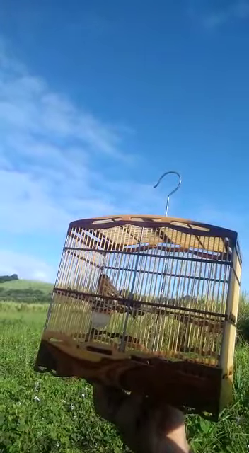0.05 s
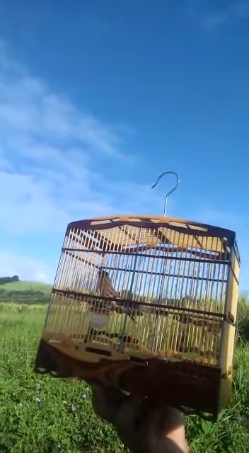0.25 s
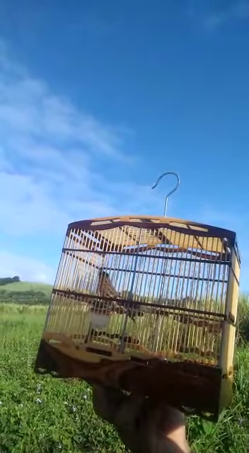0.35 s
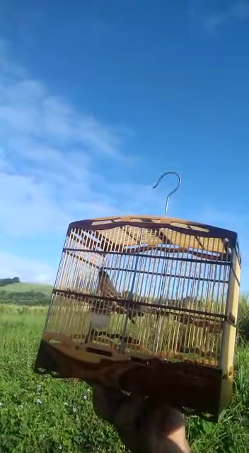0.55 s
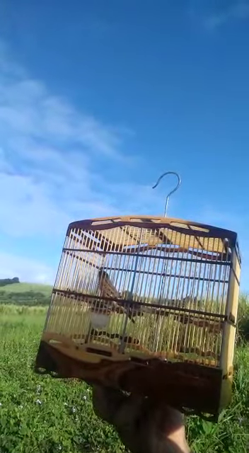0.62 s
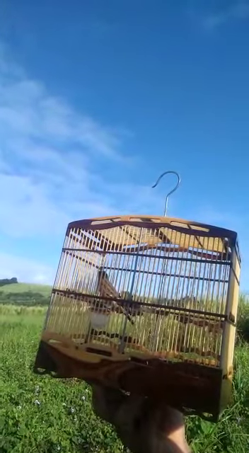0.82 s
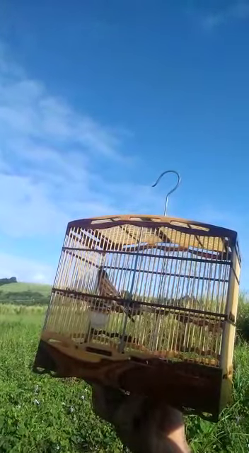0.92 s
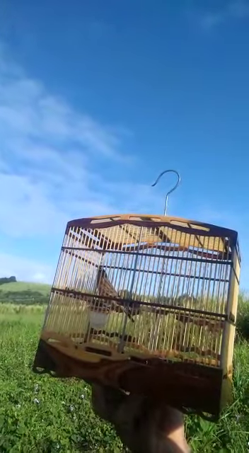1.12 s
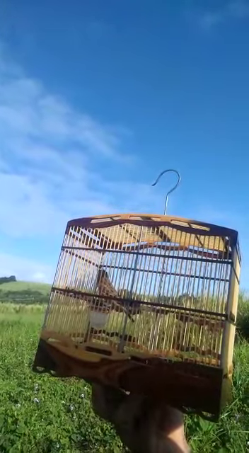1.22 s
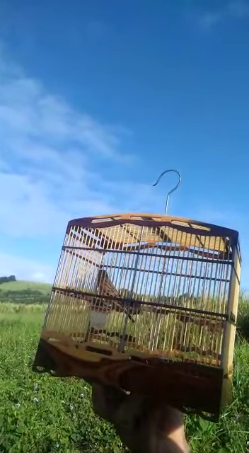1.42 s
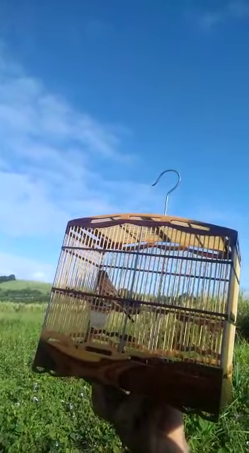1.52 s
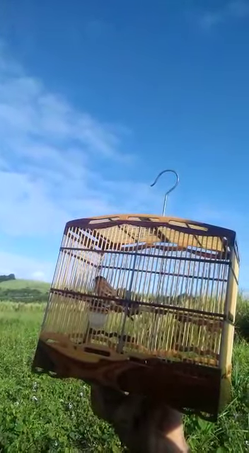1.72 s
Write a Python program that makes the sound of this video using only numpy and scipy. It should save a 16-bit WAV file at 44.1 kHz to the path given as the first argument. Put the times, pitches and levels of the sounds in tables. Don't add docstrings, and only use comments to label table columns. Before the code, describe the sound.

Finch song, high pure sliding whistles with quick trills, over soft insects and faint distant engine hum.

```python
import sys
import numpy as np
from scipy import signal
from scipy.io import wavfile
from scipy.ndimage import uniform_filter1d

SR = 44100
rng = np.random.default_rng(int(sys.argv[2]) if len(sys.argv) > 2 else 0)


def transcribe(signal):
    frames = np.atleast_2d(signal).T
    limited = np.clip(frames, -1, 1)
    pcm = np.round(limited * 32767).astype(np.int16)
    wavfile.write(sys.argv[1], SR, pcm)


def level_to_linear(level):
    exponent = np.asarray(level, float) / 20
    return 10 ** exponent


N = 77175


def at_hz(points, hz, column=1):
    points = np.array(points)
    return np.interp(np.log(hz), np.log(points[:, 0]), points[:, column])


def rms_one(x):
    return x / np.sqrt(np.mean(x ** 2) + 1e-20)


def drift(rate_hz):
    settle = 8000
    r = np.exp(-2 * np.pi * rate_hz / SR)
    noise = rng.standard_normal(N + settle)
    return rms_one(signal.lfilter([1], [1, -2 * r, r * r], noise)[settle:])


def resonate(x, hz, width_hz):
    r = np.exp(-np.pi * width_hz / SR)
    ring = [1, -2 * r * np.cos(2 * np.pi * hz / SR), r * r]
    return signal.lfilter([1, 0, -1], ring, x) * (1 - r * r) / 2


def stereo_sine(phase, level_db, pan_db, lead):
    left, right = level_to_linear(pan_db / 2), level_to_linear(-pan_db / 2)
    pair = np.array([left * np.sin(phase + lead), right * np.sin(phase)])
    return np.sqrt(8) * level_to_linear(level_db) / (left + right) * pair


def coloured(spectrum, patchy_db):
    # frequency in Hz, how alike left and right are (1 same, 0 unrelated, -1 opposite).
    likeness = [(60, 1), (1000, 0.7), (2400, 0.87), (4400, -0.39), (15000, 0.011)]
    # frequency in Hz, left over right in dB.
    tilt = [(130, -1.3), (640, 1), (1410, -7), (3100, -8), (6820, -1.5)]
    out = 0
    white = rng.standard_normal((2, 2, N + 4000))
    lowest, highest = spectrum[0][0], min(spectrum[-1][0], 19000)
    edges = lowest * 2 ** np.arange(0, np.log2(highest / lowest) + .01, .25)
    for k, (low, high) in enumerate(zip(edges, edges[1:])):
        band = signal.butter(2, [low, high], "band", fs=SR, output="sos")
        mid, side = signal.sosfilt(band, white[k % 2])[:, -N:]
        hz = np.sqrt(low * high)
        alike = np.clip(at_hz(likeness, hz), -1, 1)
        balance_db = at_hz(tilt, hz) * np.array([[.5], [-.5]])
        gain = level_to_linear(at_hz(spectrum, hz) + patchy_db * drift(6) + balance_db)
        out = out + gain * (np.sqrt(1 + alike) * mid + np.sqrt(1 - alike) * side * [[1], [-1]])
    return out / np.sqrt(np.mean(out.mean(0) ** 2))


def crests(turn, point):
    return np.cos(turn) + point * np.cos(2 * turn) + point ** 2 * np.cos(3 * turn)


def trill():
    # time of the last crest in seconds, pointedness.
    last_crests = [
        (0.9272, 0.28),
        (1.442, 0.55),
    ]
    # time in seconds, crests per second, pitch swing in Hz, level ride in dB.
    high_course = [(.795, 140, 20, 0), (.83, 128, 55, .1), (.855, 130, 72, .5), (.87, 113, 145, 1.4),
                   (.89, 113, 210, 2.2), (.908, 114, 205, 1.7), (.918, 112, 195, -1.2),
                   (.934, 112, 120, -.5)]
    swoop_course = [(1.371, 335, 130, -1), (1.396, 275, 100, -1), (1.4035, 265, 70, -.6),
                    (1.408, 180, 60, -.4), (1.414, 149, 90, -.8), (1.421, 145, 100, -.8),
                    (1.428, 114, 120, -.6), (1.442, 110, 150, -1.7), (1.456, 90, 0, 0)]
    level_shift = -0.29
    t = np.arange(N) / SR
    swing, dip = np.zeros(N), np.zeros(N)
    for rows, (crest, point) in zip([high_course, swoop_course], last_crests):
        s, rate, swing_hz, ride_db = np.transpose(rows)
        turn = 2 * np.pi * np.cumsum(np.interp(t, s, rate)) / SR
        turn = turn - np.interp(crest, t, turn)
        size = np.interp(t, s, swing_hz, left=0, right=0)
        ride = np.interp(t, s, ride_db, left=0, right=0)
        swing += size * (1 + .2 * drift(60)) * crests(turn, point)
        dip += ride * crests(turn + level_shift, point)
    return swing, dip


def whistled_note(rows, tones, main_lead, swing, dip, flutter):
    # frequency in Hz, left lead in radians, left over right in dB.
    ports = [(1700, -.2, -.5), (5400, .4, -9), (7000, 1.1, -3.5), (8300, 1.2, -4), (9500, 3.1, -4),
             (10600, 4.3, -5), (12500, 4.3, -7), (14000, 4.2, -12), (15600, 6.2, -15)]
    # frequency in Hz, change of level in dB.
    colour = [(6000, 1), (7000, -4.5), (8500, 1), (9200, -4), (10300, -13.5), (12800, 4.5), (13600, -0.5),
              (14300, 9)]
    edge_s, overtone_growth = .0025, .5
    t = np.arange(N) / SR
    s, hz, db, pan_db = np.transpose(rows)
    on = (t > s[0]) & (t < s[-1])
    now = t[on]
    pitch = uniform_filter1d(np.interp(now, s, hz), size=120, mode="nearest") + swing[on]
    level = uniform_filter1d(np.interp(now, s, db), size=200, mode="nearest") + dip[on]
    edge = np.clip(np.minimum(now - s[0], s[-1] - now) / edge_s, 0, 1)
    cycles = np.cumsum(pitch) / SR
    main = np.argmax(tones) + 1
    out = np.zeros((2, N))
    for k, tone_db in enumerate(tones, 1):
        tone_level = level + tone_db + at_hz(colour, k * pitch)
        if k > main:
            tone_level = tone_level + overtone_growth * (level - level.max()) + 2 * flutter[on]
        if k == main:
            pan, lead = np.interp(now, s, pan_db), main_lead
        else:
            pan, lead = at_hz(ports, k * pitch, column=2), at_hz(ports, k * pitch)
        out[:, on] += edge * stereo_sine(2 * np.pi * k * cycles, tone_level, pan, lead)
    return out


def breath_puffs():
    # start in seconds, length in seconds, centre in Hz, width in Hz, level in dB.
    puffs = [
        (1.074, 0.04, 4400, 700, -45.5),
        (1.153, .01, 3660, 820, -38),
        (.448, 0.0064, 4300, 570, -57),
    ]
    t, out = np.arange(N) / SR, np.zeros((2, N))
    for s, length, hz, width_hz, db in puffs:
        x = np.clip((t - s) / length, 0, 1)
        noise = rng.standard_normal((2, N))
        breath = rms_one(resonate(resonate(noise, hz, width_hz), hz, width_hz))
        out += level_to_linear(db) * 7 * x * (1 - x) ** 2 * breath * level_to_linear([[-3], [3]])
    return out


def bird():
    # time in seconds, pitch in Hz, level in dB,
    # left over right in dB as the head turns.
    low = [(.168, 3170, -68.5, -10), (.2, 2978, -41, -12), (.222, 2855, -32.5, -10), (.25, 2771, -30.5, -9),
           (.337, 2532, -35.5, -12), (.346, 2533, -41.5, -3), (.353, 2530, -57.5, -8)]
    middle = [(.448, 4510, -55.5, -1.5), (.453, 3760, -48, 0), (.468, 3717, -30, -1), (.5, 3567, -20.5, -6),
              (.57, 3479, -21.5, -6.5), (.585, 3421, -22.5, -10.5), (.65, 3282, -23, -12),
              (.66, 3390, -37.5, -14)]
    high = [(.758, 5060, -44.5, -16), (.768, 4766, -36.5, -4), (.782, 4794, -21, -8),
            (.83, 4747, -16.5, -4), (.858, 4698, -18, -5.5), (.892, 4412, -18.5, -6.5),
            (.912, 4366, -19.5, -4), (.925, 4463, -20.5, -12), (.935, 4340, -30, -14.5)]
    nasal = [(1.084, 1428, -40.5, -10), (1.089, 1656, -48.5, -4.5), (1.1, 1680, -43, -13.5),
             (1.12, 1727, -41, -10.5), (1.142, 1746, -41.5, -11), (1.157, 1757, -56, -13)]
    nasal_under = [(1.084, 2950, -45.5, -10), (1.091, 3290, -43.5, -11), (1.118, 3440, -47, -7.5),
                   (1.16, 3547, -38, -5.5), (1.174, 3590, -53, -4.5)]
    rising = [(1.158, 3160, -48, -12), (1.166, 2680, -46.5, -10.5), (1.2, 2693, -30, -12.5),
              (1.24, 2748, -27.5, -10), (1.282, 2818, -29, -7.5), (1.29, 2750, -36.5, -8),
              (1.297, 2570, -68, -8.5)]
    swoop = [(1.371, 5380, -61, -7), (1.38, 5365, -41, -11.5), (1.395, 4827, -29, -6),
             (1.409, 4403, -20.5, -4.5), (1.43, 4090, -21.5, -0.5), (1.45, 3705, -21.5, -2.5),
             (1.475, 3482, -22, -7.5), (1.508, 3355, -27.5, -9.5), (1.52, 3280, -46, -9)]
    nasal_onset = [(1.073, 751, -64.5, -2.5), (1.079, 930, -48.5, -2), (1.083, 1200, -48, -7.5),
                   (1.087, 1488, -53, -7), (1.091, 1650, -59, -4.5)]
    low_tones = [0.5, -29, -42.5, -40.5, -58, -46]
    middle_tones = [0.5, -37, -31.5, -44]
    high_tones = [0, -28, -37]
    nasal_tones = [-20.5, -94, 7.5, -12, -26.5, -50.5, -24.5, -22.5, -30.5]
    rising_tones = [-0.5, -29.5, -47, -38]
    swoop_tones = [-0.5, -38.5, -37, -45]
    onset_tones = [-26, -16.5, -9, 1.5, -5, -11, -22]
    leads = [0.34, 0.68, -0.36, 0.34, 0.64, .07, 0.57, .5]
    song = [(low, low_tones), (middle, middle_tones), (high, high_tones), (nasal, nasal_tones),
            (nasal_under, [0]), (rising, rising_tones), (swoop, swoop_tones), (nasal_onset, onset_tones)]
    swing, dip = trill()
    flutter = drift(80)
    swing = swing + 6 * drift(120)
    dip = dip + .3 * drift(53)
    out = np.zeros((2, N))
    for (rows, tones), lead in zip(song, leads):
        out += whistled_note(rows, tones, lead, swing, dip, flutter)
    return out + breath_puffs()


def field(x):
    gap_s = 0.0037
    t = np.arange(SR // 3) / SR
    fade = 0
    for db, t60 in [(-34.5, 0.27), (-27.5, 0.08)]:
        fade = fade + level_to_linear(db - 60 * t / t60) * np.sqrt(2 * np.log(1000) / t60 / SR)
    tail = rng.standard_normal((2, len(t))) * fade * (t > gap_s)
    return signal.fftconvolve(x[1:], tail, axes=1)[:, :N]


def cricket(bouts, pan_db, lead, octave_db):
    duty, swell_db, sweep_hz = .8, 6, 60
    t, out = np.arange(N) / SR, np.zeros((2, N))
    wander = drift(30)
    for s, pulses, period, hz, db in bouts:
        beat = (t - s) / period + duty * .63
        x = np.clip(beat % 1 / duty, 0, 1)
        shape = np.sin(np.pi * x ** 1.9) * (beat > 0) * (beat < round(pulses))
        warm_up = (s > 0) * np.exp(-np.clip(beat, 0, None) / 3)
        level = db - swell_db * warm_up + 1.2 * wander
        pitch = hz - 100 * warm_up + sweep_hz * (.5 - x) + 12 * wander
        phase = 2 * np.pi * np.cumsum(pitch) / SR
        tone = stereo_sine(phase, level, pan_db, lead)
        octave = stereo_sine(2 * phase, level + octave_db, pan_db, 2 * lead)
        out += shape * (tone + octave)
    return out


def two_crickets():
    # first pulse in seconds, number of pulses, seconds per pulse, pitch in Hz, level in dB.
    right_bouts = [
        (-.002, 6, 0.019, 5700, -54.5),
        (.38, 10, 0.02, 5590, -61),
        (.579, 14, .0181, 5675, -52),
        (1.284, 6, 0.019, 5590, -56.5),
        (1.386, 12, .0181, 5710, -52),
        (.525, 1, 0.045, 5350, -51),
    ]
    middle_bouts = [
        (.133, 12, 0.018, 6700, -55.5),
        (.6385, 10, 0.022, 6750, -55.5),
        (1.19, 8, .0237, 6840, -59.5),
    ]
    right = cricket(right_bouts, pan_db=-10, lead=-1.73, octave_db=-21)
    return right + cricket(middle_bouts, pan_db=-1, lead=0.58, octave_db=-46.5)


def insect_chorus():
    # frequency in Hz, level in dB.
    spectrum = [(4600, -26), (5700, -5.5), (6800, 9), (7500, 3), (8300, -52.5), (9500, -34.5)]
    top = signal.butter(6, 7900, fs=SR, output="sos")
    return level_to_linear(-63.5) * signal.sosfilt(top, coloured(spectrum, patchy_db=2.0))


def engine():
    # frequency in Hz, level in dB, width in Hz.
    hums = [(52.1, -52.5, 1.3), (78.4, -56, 3.6), (99.76, -60.5, 1), (148.1, -62.5, 12)]
    # frequency in Hz, level in dB.
    rumble = [(36, -9), (76, 3.5), (214, -16.5), (420, -37.5)]
    hum = 0
    for hz, db, width_hz in hums:
        noise = rng.standard_normal((2, 2 * N))
        hum = hum + level_to_linear(db) * rms_one(resonate(noise, hz, width_hz)[:, N:])
    return hum[0] + .2 * hum[1] * [[1], [-1]] + level_to_linear(-52.5) * coloured(rumble, patchy_db=5.0)


def road_hiss():
    # frequency in Hz, level in dB.
    spectrum = [(300, -24), (500, -12.5), (700, -10), (1070, -3.5), (1400, -12), (2300, -13.5),
                (3100, -24.5), (4600, -34.5)]
    # time in seconds, level in dB.
    swell = [(0, -61), (0.301, -55.5), (1.3, -58), (1.75, -59)]
    s, db = np.transpose(swell)
    level = np.interp(np.arange(N) / SR, s, db) + 2.0
    return level_to_linear(level) * coloured(spectrum, patchy_db=2.0)


def air_hiss():
    # frequency in Hz, level in dB.
    spectrum = [(8000, -8.5), (9500, -20.5), (11500, -7.5), (12300, -10), (13300, -3.5), (17000, -4)]
    return level_to_linear(-75.5) * coloured(spectrum, patchy_db=2.0)


def scene():
    song = bird()
    insects = two_crickets() + insect_chorus()
    return song + field(song) + insects + engine() + road_hiss() + air_hiss()


def band_limit(x):
    return signal.sosfilt(signal.butter(12, 15840, fs=SR, output="sos"), x)


def record(dry):
    low_cut = signal.butter(4, 42, "high", fs=SR, output="sos")
    return band_limit(signal.sosfilt(low_cut, dry))


dry = scene()
out = record(dry)
transcribe(out)
```